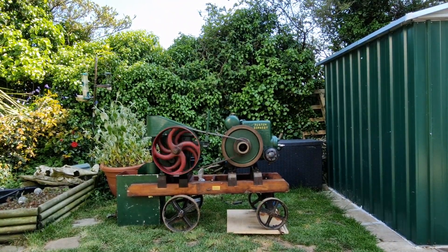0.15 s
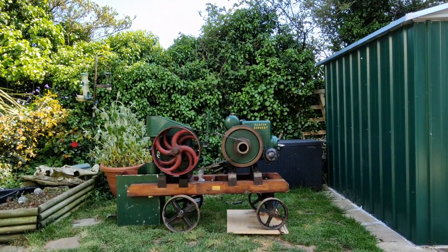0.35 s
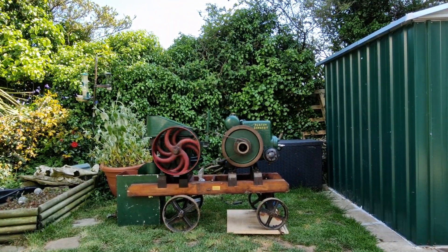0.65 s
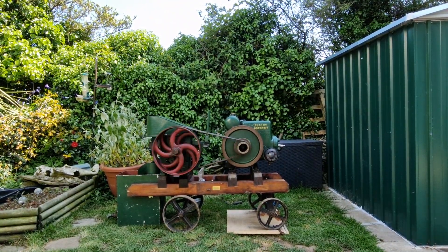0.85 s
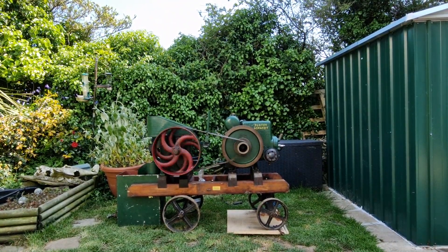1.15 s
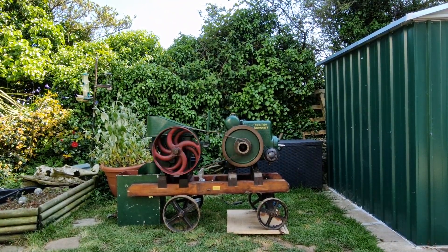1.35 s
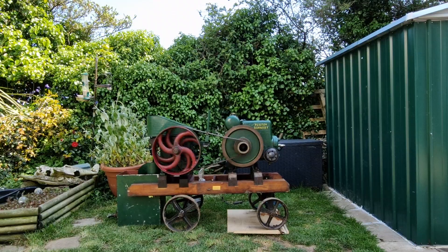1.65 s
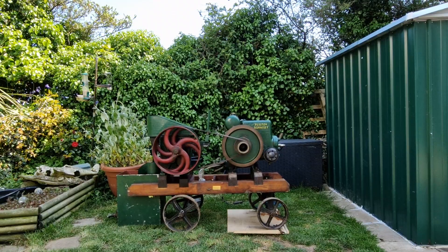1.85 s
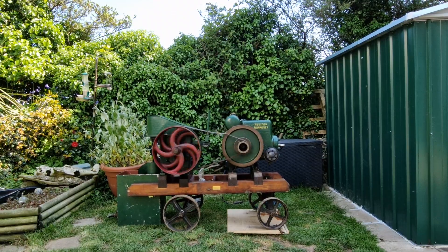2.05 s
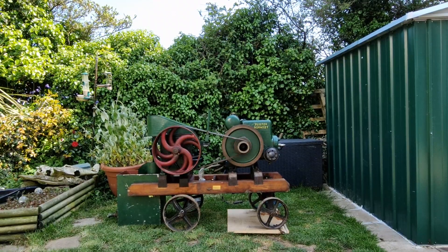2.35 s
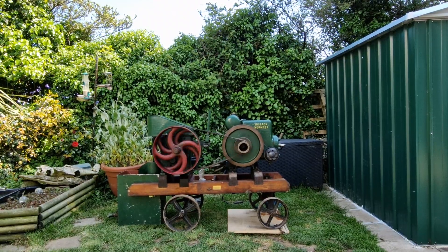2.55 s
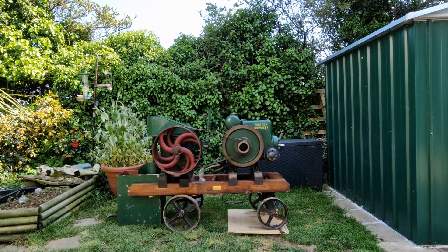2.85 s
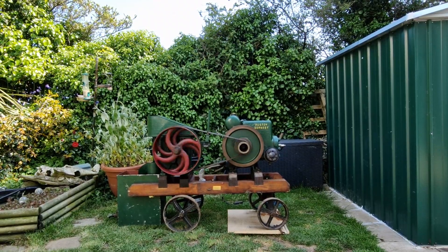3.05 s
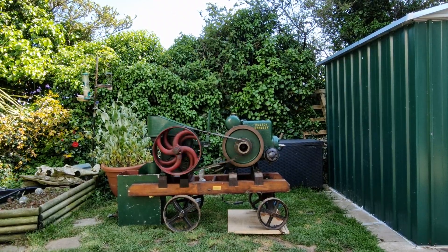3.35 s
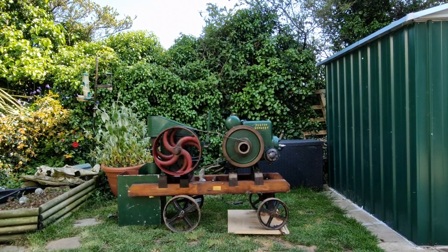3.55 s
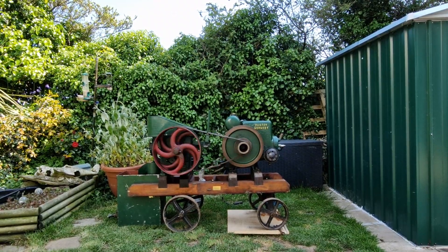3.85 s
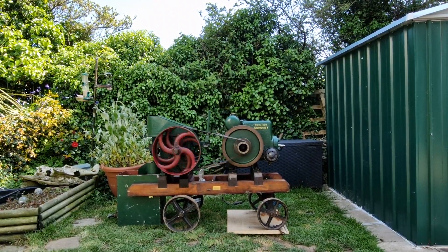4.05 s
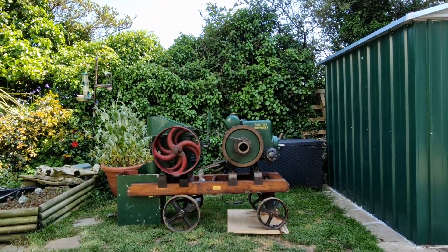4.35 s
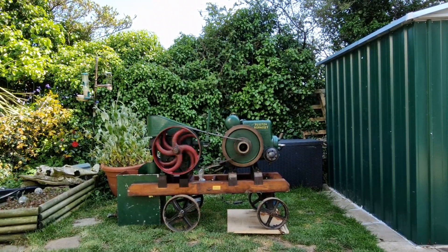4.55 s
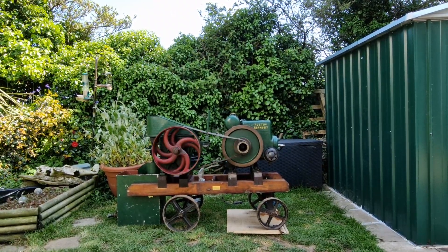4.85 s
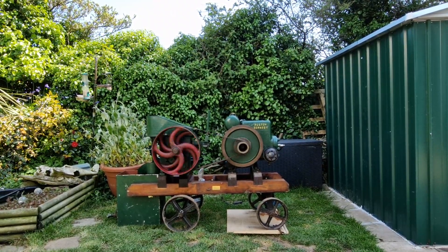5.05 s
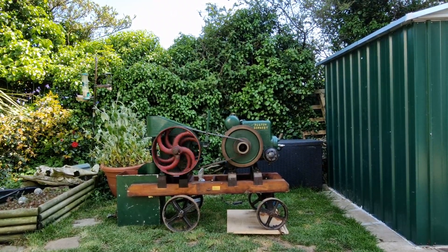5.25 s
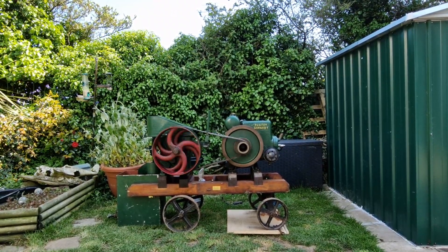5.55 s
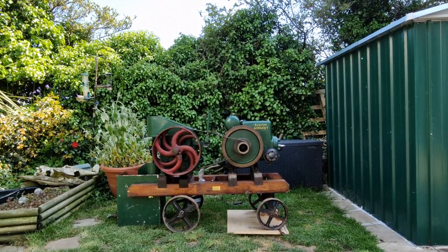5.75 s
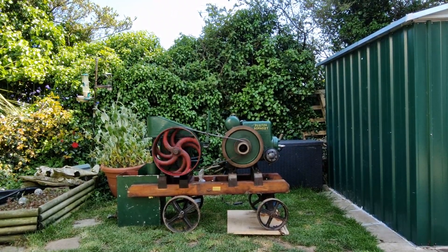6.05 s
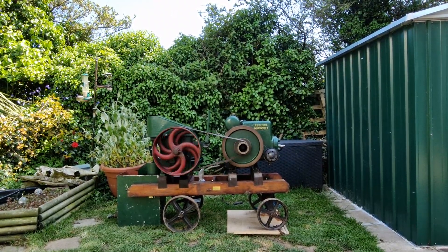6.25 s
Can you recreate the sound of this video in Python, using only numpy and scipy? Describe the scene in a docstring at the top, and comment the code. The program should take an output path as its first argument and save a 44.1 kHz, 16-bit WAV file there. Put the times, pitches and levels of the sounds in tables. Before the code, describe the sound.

An old single-cylinder engine chugs steadily outdoors, with hissing exhaust barks, deep thumps, clacking gear and a squeaking belt.

```python
"""An old single-cylinder stationary engine fires about 4.3 times a second on its trolley in a garden.
Each firing is a hiss at the exhaust valve, a bark in the pipe and a deep thump in the silencer.
Between firings the valve gear clacks and the driven belt squeaks; its joint ticks round once a lap.
The trolley bumps softly, gears and bearings whirr, and a steel shed and the hedges echo."""
import sys
import numpy as np
from scipy import signal
from scipy.fft import rfft, irfft, next_fast_len
from scipy.io import wavfile
from scipy.ndimage import map_coordinates

SR = 44100
rng = np.random.default_rng(int(sys.argv[2]) if len(sys.argv) > 2 else 0)


def unload_wav(signal):
    """Save mono or channel-first audio to the path in sys.argv[1] as 16-bit WAV at rate SR, clipped to [-1, 1]."""
    wavfile.write(
        sys.argv[1],
        SR,
        np.round(np.clip(np.atleast_2d(signal).T, -1, 1) * 32767).astype(np.int16),
    )


N = 282240
FIRST_BEAT_S, CYCLE_S = 0.1876, 0.233565

# governor hunting: time_s, lateness_s
GOVERNOR_DRIFT = [(0.19, -0.0023), (1.5, -.0019), (1.85, -0.00031), (2.52, 0.00095), (2.97, 0.0052),
                  (3.69, 0.0035), (3.95, 0.001), (4.75, -.0026), (5.35, .0008), (5.82, 0.0003),
                  (6.26, -0.0051)]
def firings():
    """Firing times: a steady beat with a slow drift."""
    beat_s = np.arange(FIRST_BEAT_S, N / SR, CYCLE_S)
    return beat_s + np.interp(beat_s, *np.transpose(GOVERNOR_DRIFT))


# harder and softer barks: time_s, offset_db
ODD_BARKS = [(1.12, -5.5), (1.35, -3.5), (1.59, -1.6), (1.82, 2), (2.06, -2.5), (2.52, -3), (2.76, 1.8),
             (3.46, -2.5), (3.93, -6), (4.39, -4), (5.56, 0.5), (6.02, -1.3)]
# gas jet at the valve: freq_hz, gain_db
JET_SPECTRUM = [(300, -30.5), (700, -18.5), (1800, -26), (3800, -29), (4600, -15), (5600, -15),
                (6150, -11.5), (6900, -19.5), (7450, -14), (8400, -31), (9500, -121), (10800, -40),
                (12000, -30), (13700, -20.5), (16000, -43)]
# exhaust pipe resonances: freq_hz, width_hz, gain_db
PIPE_MODES = [(699, 190, -16.5), (1325, 174, -11), (1565, 236, -18), (2000, 300, -21), (2283, 99, -16.5),
              (2960, 215, -6.5), (3680, 75, -15.5)]
def exhaust_blast(eddies_db, shock_db, lingering_db, hiss_rise_db_per_s):
    """The valve gap hisses, then a shock and turbulent gas ring the pipe. Returns (on axis, spread)."""
    fire_s = firings()
    odd_s, odd_db = np.transpose(ODD_BARKS)
    bark_db = 0.8 + np.bincount(nearest(fire_s, odd_s), odd_db, len(fire_s))
    hiss_db = 0.17 + hiss_rise_db_per_s * (fire_s - fire_s.mean()) + rng.normal(0, 0.54, len(fire_s))
    jet = swells(fire_s + 0.0071, hiss_db, width_s=0.0033)
    jet += swells(fire_s + 0.0048, hiss_db - 24, width_s=0.0084)
    gush = swells(fire_s + 0.012, bark_db - 0.8, width_s=0.0026)
    gush += swells(fire_s + 0.0046, bark_db - 8.5, width_s=0.0019)
    eddies = amp(eddies_db * wobble(900))  # lumps of gas crackle
    jet, gush = np.array([jet, gush]) * eddies * rng.standard_normal((2, N))
    shocks = impulses(fire_s + 0.011 + rng.normal(0, 0.0006, len(fire_s)), bark_db + shock_db)
    front_hz = 2200  # the pipe rounds off the shock front
    shocks = filtered(shocks, lambda hz: front_hz / (front_hz + 1j * hz))
    lingering = swells([0], [lingering_db], width_s=0.0019) * rng.standard_normal(N)  # earlier firing
    on_axis = coloured(jet, JET_SPECTRUM) + resonate(gush - shocks, PIPE_MODES)
    return on_axis, jet + gush + lingering


# valve opens, cylinder empties, valve shuts, intake: delay_s, width_s, level_db
GAS_PUSHES = [(.0008, 0.00086, -11), (0.02, 0.0021, 3), (.073, .0008, -24), (.135, 0.0015, -19)]
# silencer resonances: freq_hz, width_hz, gain_db
SILENCER_MODES = [(31.33, 7.8, -17), (85.4, 30, -7.5), (135.1, 38, -7.5), (154.5, 12, 1), (210, 30, -16.5),
                  (256.4, 43, 1.5), (314.8, 25.1, 8.5), (409.5, 9.4, 7.5), (614, 25, -14)]
def silencer_thump(level_db, mouth_hz):
    """Pushes of gas ring the silencer; its small mouth radiates the deepest part poorly."""
    fire_s = firings()
    thump_db = np.full(len(fire_s), level_db)
    thump_db[0] -= 7.5  # the first charge pushes less gas
    flow = sum(swells(fire_s + delay_s, thump_db + push_db + rng.normal(0, 0.38, len(fire_s)), width_s)
               for delay_s, width_s, push_db in GAS_PUSHES)
    return filtered(resonate(flow, SILENCER_MODES), lambda hz: (1j * hz / (mouth_hz + 1j * hz)) ** 2)


# hard valve gear clacks: start_s, level_db
HARD_CLACKS = [(0.311, -35.5), (0.782, -38), (1.013, -40.5), (1.243, -38), (1.727, -39), (3.353, -37),
               (4.283, -35), (4.75, -34.5), (4.979, -36.5), (5.455, -33.5), (5.686, -36), (6.151, -32.5)]
# gear and crankcase resonances: freq_hz, width_hz, gain_db
CASE_MODES = [(606, 36, 2), (694, 48, 1), (754, 38, -2.5), (1050, 150, -7), (1326, 150, -1.5),
              (1524, 183, 0.5), (1990, 130, -19)]
# crankcase radiation: freq_hz, gain_db
CASE_SPECTRUM = [(300, -16), (600, 5), (1600, -1), (2200, -5), (4000, -5), (7000, -50), (14000, -32)]
def valve_gear(delay_s, soft_db, knock_db, clack_db, rattle_db):
    """Between firings the gear knocks the crankcase and rattles on, now softly, now hard."""
    start_s = firings()[:-1] + delay_s
    level_db = soft_db + rng.uniform(-5, 4, len(start_s))
    hard_s, hard_db = np.transpose(HARD_CLACKS)
    hard = nearest(start_s, hard_s)
    start_s[hard], level_db[hard] = hard_s, hard_db
    knocks = impulses(start_s, level_db + knock_db)
    rattle = swells(start_s + 0.012, level_db + rattle_db, width_s=0.0085) * rng.standard_normal(N)
    clacks = amp(clack_db) * bursts(start_s, level_db, t60_s=0.035)
    return coloured(resonate(knocks + clacks + rattle, CASE_MODES), CASE_SPECTRUM)


# belt slips after each firing: delay_s, offset_db
BELT_SLIPS = [(.086, -5.5), (.106, -3), (0.153, -2), (.198, -0.5)]
# the belt's two notes: pitch_hz
BELT_NOTES_HZ = [1695, 1804]
# slips that squeal out: time_s, level_db, pitch_hz
BELT_SQUEALS = [(0.149, -42.5, 1660), (0.289, -44, 1805), (0.848, -41.5, 1723), (0.975, -40, 1698),
                (1.028, -45, 1754), (1.314, -42.5, 1673), (1.437, -41, 1713), (1.74, -41, 1783),
                (1.907, -43.5, 1664), (2.14, -44.5, 1778), (2.21, -39.5, 1693), (2.374, -40, 1692),
                (2.611, -41.5, 1662), (2.67, -41, 1662), (3.893, -41, 1700), (4.115, -44, 1693),
                (4.707, -45, 1796), (4.779, -44.5, 1813), (4.818, -45.5, 1660), (4.938, -42.5, 1683),
                (5.254, -46, 1805), (5.288, -40, 1680), (5.409, -41, 1716), (5.996, -46, 1732)]
def belt_squeaks(gain_db, soft_db, width_s, waver_hz, flutter_db, overtone_db, scatter_db):
    """The belt slips on its pulley at set points of the cycle, in short, fluttering squeaks."""
    fire_s = firings()
    delay_s, offset_db = np.transpose(BELT_SLIPS)
    cycles_s = np.r_[fire_s[0] - CYCLE_S, fire_s]
    slip_s = (cycles_s[:, None] + delay_s).ravel()
    scatter, note_choice = rng.standard_normal((len(slip_s), 2)).T
    slip_db = soft_db + np.tile(offset_db, len(cycles_s)) + scatter_db * scatter
    slip_hz = np.where(note_choice < 0, *BELT_NOTES_HZ).astype(float)
    loud = nearest(slip_s, np.array(BELT_SQUEALS)[:, 0])
    slip_s[loud], slip_db[loud], slip_hz[loud] = np.transpose(BELT_SQUEALS)
    pitch_hz = np.interp(np.arange(N) / SR, slip_s, slip_hz) + waver_hz * wobble(320)
    envelope = swells(slip_s, slip_db + gain_db, width_s) * amp(flutter_db * wobble(240))
    phase = 2 * np.pi * np.cumsum(pitch_hz) / SR
    overtones = np.sin(2 * phase) + np.sin(3 * phase) / 2
    return envelope * (np.sin(phase) + amp(overtone_db) * overtones)


# joint touches a pulley, strikes it, meets the other: delay_s, level_db, change_db_per_s
JOINT_HITS = [(-.013, -37, 0), (0, -28, .5), (0.221, -36, -1.5)]
# metal tick: freq_hz, gain_db
TICK_SPECTRUM = [(300, -16), (1200, 0), (2000, 3), (3000, 9), (4500, 6), (7000, -1.5), (9500, -30),
                 (13000, -14), (16000, -34)]
def belt_joint(first_s, lap_s, gain_db, t60_s):
    """The belt's metal joint ticks on the pulleys every lap."""
    hits = [(start_s + delay_s, level_db + change_db_per_s * start_s)
            for start_s in np.arange(first_s, N / SR, lap_s)
            for delay_s, level_db, change_db_per_s in JOINT_HITS]
    return amp(gain_db) * coloured(bursts(*np.transpose(hits), t60_s), TICK_SPECTRUM)


# trolley rocking: start_s, level_db
TROLLEY_BUMPS = [(0.339, -35), (0.979, -35), (1.024, -34), (1.242, -32.5), (1.548, -30.5), (2.366, -27.5),
                 (2.62, -33)]
def trolley(gain_db):
    """The wooden trolley bed booms softly when it rocks."""
    start_s, level_db = np.transpose(TROLLEY_BUMPS)
    bumps = swells(start_s + 0.00416, level_db + gain_db, width_s=0.00146)
    return resonate(bumps, modes=[(67, 23, 1.5), (126, 51, -8)])


# running noise: freq_hz, gain_db
WHIRR_SPECTRUM = [(18, -51), (35, -27), (60, -24.5), (150, -25.5), (230, -29), (470, -43.5), (600, -37),
                  (700, -37.5), (900, -46.5), (1400, -42), (2400, -47), (4000, -52.5), (5500, -59),
                  (8500, -92), (12000, -68), (16000, -88)]
# whirr direction: freq_hz, right_minus_left_db
WHIRR_BALANCE = [(200, -0.5), (1500, 0), (3000, -4.5), (6000, -40), (14000, -19)]
# left-right likeness: freq_hz, coherence
WHIRR_COHERENCE = [(40, 0.81), (120, 0.99), (300, 0.9), (700, 0.58), (1500, 0), (5000, 0)]
def whirr(gain_db, uneven_db):
    """Gears, bearings and belt rustle unevenly."""
    def spread_rad(hz):
        return np.arccos(np.clip(along(WHIRR_COHERENCE, hz), -1, 1)) / 2
    mid, side = rng.standard_normal((2, N)) * amp(gain_db + uneven_db * wobble(45))
    mid = filtered(mid, lambda hz: np.cos(spread_rad(hz)))
    side = filtered(side, lambda hz: np.sin(spread_rad(hz)))
    return coloured(np.array([mid + side, coloured(mid - side, WHIRR_BALANCE)]), WHIRR_SPECTRUM)


# garden reverberation: freq_hz, t60_s
GARDEN_DECAY = [(200, 0.29), (1000, 0.26), (3000, 0.4), (6500, 0.34), (13000, 0.23)]
def garden(sound, shed_delay_s, shed_db, shed_width_s, build_up_s):
    """The ribbed shed wall returns a smeared echo; stirring leaves give each firing a new short tail."""
    cuts = np.r_[0, (firings() * SR).astype(int), N]
    noise = rng.standard_normal((len(cuts) - 1, 2, SR // 3))
    hz, frame_s, spectra = signal.stft(noise, SR, nperseg=256)
    decay = amp(-60 * frame_s / along(GARDEN_DECAY, hz)[:, None])
    tails = signal.istft(spectra * decay, SR, nperseg=256)[1]
    time_s = np.arange(tails.shape[-1]) / SR
    shed = amp(shed_db) * np.exp(-0.5 * ((time_s - shed_delay_s) / shed_width_s) ** 2)
    onset = 1 - np.exp(-(time_s / build_up_s) ** 2)
    tails = tails * onset * (1 + shed)
    echoes = np.zeros((2, N + SR))
    for start, end, tail in zip(cuts, cuts[1:], tails):
        echo = signal.fftconvolve(sound[None, start:end], tail / np.linalg.norm(tail[0]), axes=1)
        echoes[:, start:start + echo.shape[1]] += echo
    return echoes[:, :N]


# exhaust echo on each side: freq_hz, gain_db
LEFT_ECHO_SPECTRUM = [(150, -14), (470, -20.5), (600, -11.5), (850, -26), (1300, -22), (2400, -29),
                      (3100, -26), (5000, -25), (7500, -26), (9500, -47.5), (11000, -35), (13500, -25.5),
                      (16000, -38)]
RIGHT_ECHO_SPECTRUM = [(150, -20.5), (470, -16), (600, -15), (850, -25), (1400, -21), (2100, -24),
                       (3100, -29), (6000, -39), (7500, -43.5), (9500, -59.5), (13500, -37), (16000, -62)]
def exhaust_echo(spread):
    """The garden returns the exhaust noise, coloured differently left and right."""
    left, right = garden(spread, shed_delay_s=0.015, shed_db=-0.5, shed_width_s=0.003, build_up_s=0.00065)
    return np.array([coloured(left, LEFT_ECHO_SPECTRUM), coloured(right, RIGHT_ECHO_SPECTRUM)])


def amp(db):
    return 10 ** (np.asarray(db) / 20)


def along(points, hz):
    """Interpolate (freq_hz, value) points on a log axis."""
    freq_hz, values = np.transpose(points)
    return np.interp(np.log(hz + 1), np.log(freq_hz + 1), values)


def filtered(sound, response):
    """Apply a complex frequency response."""
    size = next_fast_len(N + SR // 2)
    return irfft(rfft(sound, size) * response(np.fft.rfftfreq(size, 1 / SR)), size)[..., :N]


def coloured(sound, points):
    """Apply a (freq_hz, gain_db) curve."""
    return filtered(sound, lambda hz: amp(along(points, hz)))


def resonate(sound, modes):
    """Apply parallel resonances."""
    return filtered(sound, lambda hz: sum(
        amp(gain_db) * 1j * hz * width_hz / (freq_hz ** 2 - hz ** 2 + 1j * hz * width_hz)
        for freq_hz, width_hz, gain_db in modes))


def wobble(rate_hz):
    """A smooth random curve."""
    knots = rng.standard_normal(int(N * rate_hz / SR) + 4)
    return map_coordinates(knots, [np.arange(N) * rate_hz / SR])


def swells(times_s, levels_db, width_s):
    """A bell-shaped swell at each time."""
    envelope = np.zeros(N)
    for peak_s, level_db in zip(times_s, levels_db):
        span = np.arange(max(int((peak_s - 5 * width_s) * SR), 0),
                         min(int((peak_s + 5 * width_s) * SR), N))
        envelope[span] += amp(level_db) * np.exp(-0.5 * ((span / SR - peak_s) / width_s) ** 2)
    return envelope


def impulses(times_s, levels_db):
    return np.bincount((times_s * SR).astype(int), amp(levels_db), N)


def bursts(times_s, levels_db, t60_s):
    """Sudden, decaying noise at each time."""
    decay = amp(-60 * np.arange(SR // 2) / SR / t60_s)
    return signal.fftconvolve(impulses(times_s, levels_db), decay)[:N] * rng.standard_normal(N)


def nearest(times_s, chosen_s):
    """Index of the time closest to each chosen moment."""
    return np.abs(times_s[:, None] - chosen_s).argmin(axis=0)


# exhaust and ticks beam their treble left: freq_hz, right_minus_left_db
TREBLE_BEAM = [(200, -10), (700, 3), (1300, -5), (2050, 5), (3000, -8.5), (4500, -16.5), (7000, -18),
               (14000, -15)]
def scene():
    """Exhaust and machinery in stereo, their echoes and the whirr."""
    exhaust, spread = exhaust_blast(eddies_db=1, shock_db=23.5, lingering_db=0.5, hiss_rise_db_per_s=0.23)
    ticks = belt_joint(first_s=0.1198, lap_s=0.7302, gain_db=-4, t60_s=0.042)
    belt = belt_squeaks(gain_db=1.5, soft_db=-51.5, width_s=0.0084, waver_hz=22.1,
                        flutter_db=3.5, overtone_db=-17, scatter_db=2.5)
    gear = valve_gear(delay_s=0.14, soft_db=-47.5, knock_db=35.5, clack_db=13, rattle_db=4)
    sharp = exhaust + ticks
    low = silencer_thump(level_db=-1.01, mouth_hz=40) + trolley(gain_db=11.5)
    left = sharp + amp(-2) * (belt + gear) + amp(0.15) * low
    right = coloured(sharp, TREBLE_BEAM) + amp(1.5) * (belt + gear) + amp(-0.15) * low
    right_lag_s = 0.00006
    direct = np.array([left, filtered(right, lambda hz: np.exp(-2j * np.pi * hz * right_lag_s))])
    echoes = exhaust_echo(spread)
    echoes += amp(-8) * garden(amp(2) * belt + gear + ticks,
                               shed_delay_s=0.012, shed_db=6, shed_width_s=0.0034, build_up_s=0.01)
    return direct + echoes + whirr(gain_db=1.5, uneven_db=2.8)


def record(dry):
    """A steep low-pass cuts the highest treble."""
    top_hz, ramp_hz = 16400, 300
    return filtered(dry, lambda hz: np.clip((top_hz - hz) / ramp_hz, 0, 1))


dry = scene()
out = record(dry)
unload_wav(out)
```